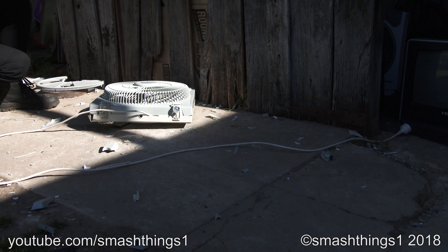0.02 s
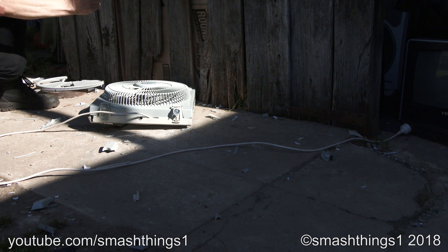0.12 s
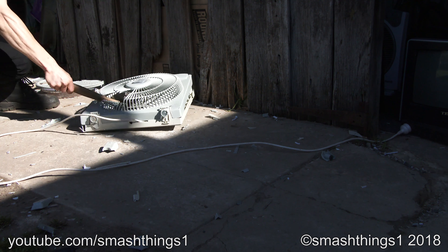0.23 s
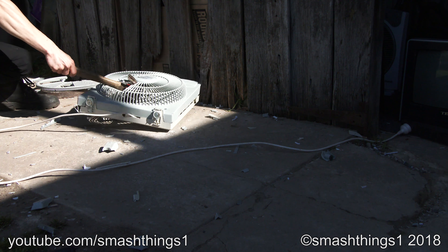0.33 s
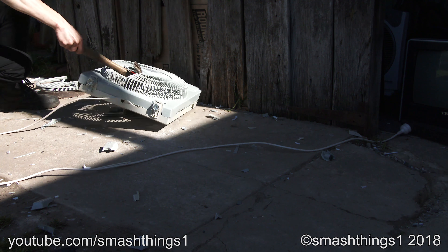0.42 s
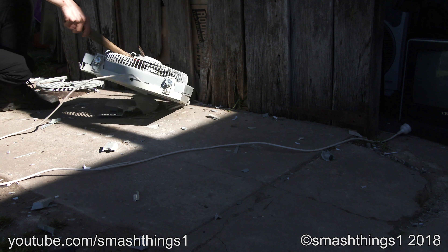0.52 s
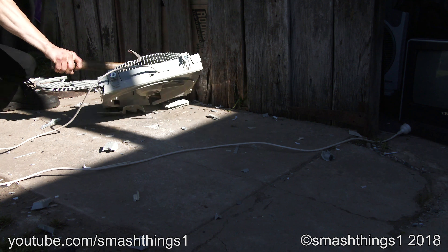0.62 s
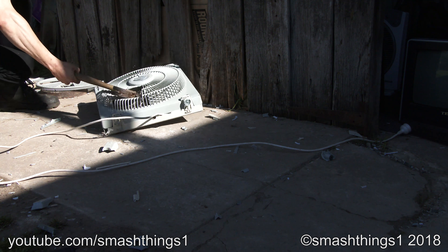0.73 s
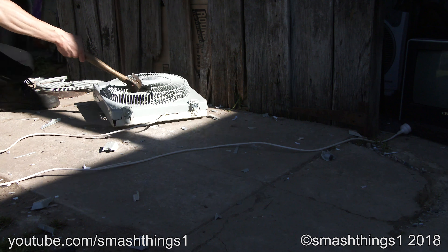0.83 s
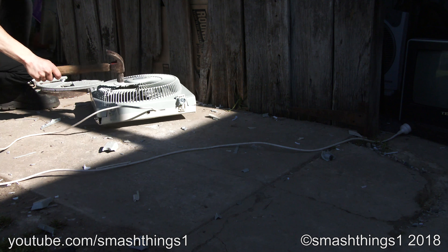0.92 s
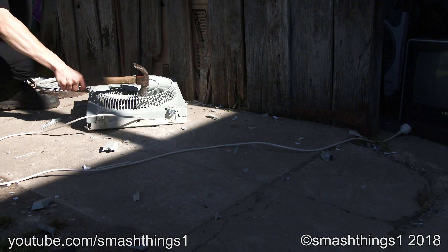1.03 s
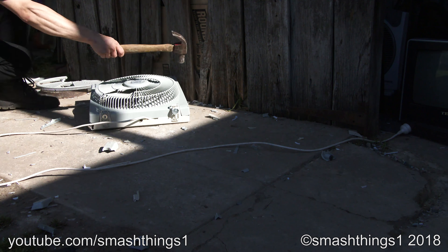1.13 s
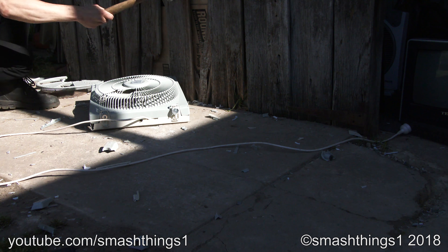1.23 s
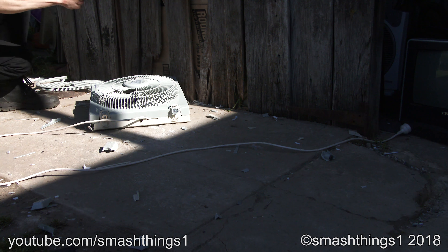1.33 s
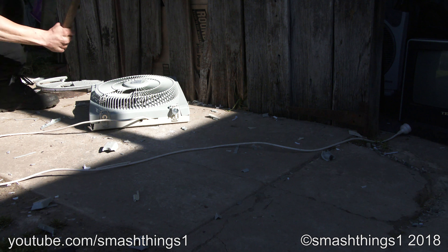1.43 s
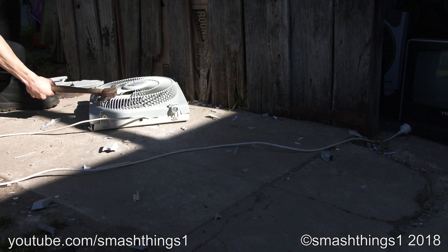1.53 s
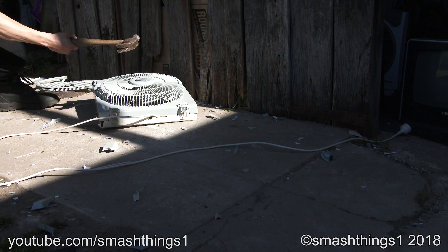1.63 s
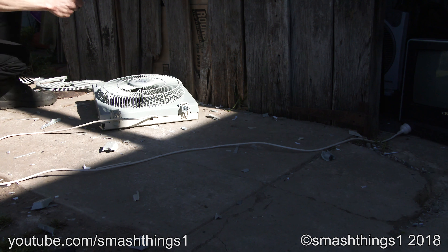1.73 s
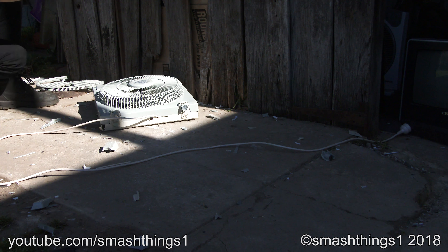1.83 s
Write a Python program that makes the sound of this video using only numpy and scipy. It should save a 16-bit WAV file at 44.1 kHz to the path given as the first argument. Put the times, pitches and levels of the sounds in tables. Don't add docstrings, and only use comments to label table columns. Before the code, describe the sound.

A hammer cracks a plastic box fan on concrete; the fan lifts, clatters down in hard bounces, rocks and rattles, then a second crunching blow. Quiet yard, close microphone, faint fence echoes, narrow stereo.

```python
import sys
import numpy as np
from scipy import signal
from scipy.fft import rfft, irfft, next_fast_len
from scipy.io import wavfile

SR = 44100
rng = np.random.default_rng(int(sys.argv[2]) if len(sys.argv) > 2 else 0)


def level_to_linear(level):
    exponent = np.asarray(level, float) / 20
    return 10 ** exponent


def put_to_file(sound):
    columns = np.atleast_2d(sound).T
    safe = np.clip(columns, -1, 1)
    whole_steps = np.round(safe * 32767)
    wavfile.write(sys.argv[1], SR, whole_steps.astype(np.int16))


N = 81585


def at_hz(points, hz):
    p = np.array(points, float)
    return level_to_linear(np.interp(np.log(hz + 1), np.log(p[:, 0]), p[:, 1]))


def grains(shape, per_s, uneven_db):
    size = level_to_linear(uneven_db * np.minimum(rng.exponential(1, shape), 5))
    sign = rng.choice([-1, 1], shape)
    present = rng.random(shape) < per_s / SR
    x = size * sign * present
    return x / np.sqrt(np.mean(x ** 2))


# frequency_hz, level_db
YARD_SPECTRUM = [(18, -29.5), (30, -6.5), (149, 0.5), (459, -9), (698, -13), (2330, -11), (3030, -12.5),
                 (8200, -23), (15800, -48.5)]


def yard_air():
    hz = np.arange(N // 2 + 1) * SR / N
    air = irfft(rfft(rng.standard_normal((2, N))) * at_hz(YARD_SPECTRUM, hz), N)
    side_gain = level_to_linear([[0], [-7]])
    return level_to_linear(-76.5) * air / air.std() * side_gain


# delay_s, level_db
FENCE_ECHOES = [(.006, -26), (.017, -20.5)]


def fence_echoes(fan):
    dull = signal.lfilter([.5], [1, -.5], fan)
    out = fan.copy()
    for delay_s, db in FENCE_ECHOES:
        lag = int(delay_s * SR)
        out[:, lag:] += level_to_linear(db) * dull[:, :-lag]
    return out


# start_s, pitch_hz, level_db, t60_s
METAL_PINGS = [(0.0, 2121, -69, 1.8), (0.102, 3121, -64, .4), (0.125, 3760, -76, .8),
               (0.195, 2331, -63.5, 1.5), (0.11, 2370, -71, 0.51), (.13, 3960, -77, 0.91),
               (0.448, 15400, -86.5, 0.31), (0.542, 15400, -69.5, 0.062), (0.542, 10750, -69.5, 0.13),
               (1.24, 2340, -72, 0.62)]


def metal_pings():
    out, t = 0, np.arange(N) / SR
    for s, hz, db, t60 in METAL_PINGS:
        age = np.maximum(t - s, 0)
        envelope = level_to_linear(db - 60 * age / t60) * np.minimum(age / 0.006, 1)
        split_hz = hz + 33 * rng.uniform(0.18, 1.6)
        ring = np.sin(2 * np.pi * hz * age) + 0.5 * np.sin(2 * np.pi * split_hz * age)
        out = out + envelope * ring
    return out * np.array([[1], [.3]])


# start_s, level_db, pitch_hz
GROUND_THUMPS = [
    (0.252, -30, 59.6),
    (0.416, -58, 50),
    (0.919, -60.5, 55),
    (0.681, -60.5, 109),
    (0.814, -68.5, 49.7),
    (1.554, -30, 59),
]


def ground_thumps():
    out, t = 0, np.arange(N) / SR
    for s, db, hz in GROUND_THUMPS:
        turns = np.maximum(t - s, 0) * hz
        envelope = np.minimum(4 * turns, 1) * np.exp(-turns / 0.11)
        out = out + level_to_linear(db) * np.sin(2 * np.pi * turns) * envelope
    return out


# start_s, pitch_hz, level_db, t60_s
PANEL_RINGS = [(.04, 661, -50, 0.057), (.44, 668, -56, 0.49), (.146, 635, -42, 0.049),
               (.146, 1030, -53, 0.068), (.186, 1125, -55.5, 0.094), (.26, 1510, -30, 0.12),
               (.26, 1017, -35, 0.12), (.3, 989, -27, 0.053), (.762, 211, -42.5, 0.091),
               (.684, 1310, -12.5, 0.027), (.684, 1048, -26.5, 0.098), (.684, 1685, -25, 0.091),
               (.76, 1086, -10.5, 0.035), (.76, 667.5, -26, 0.15), (.768, 1618, -29, 0.12),
               (.814, 1129, -30, 0.071), (.886, 262, -48, 0.14), (.935, 495, -43, 0.14),
               (1.039, 1030, -23.5, 0.028), (0.251, 212.4, -36.5, 0.0943), (1.085, 655, -26.5, 0.096),
               (1.118, 646, -31, 0.081), (.26, 800, -21, 0.058), (1.552, 525.4, -25, 0.11),
               (1.555, 917, -21.5, 0.056), (1.558, 1667, -23.5, 0.079), (1.558, 1400, -33, 0.049),
               (1.555, 380, -33.5, 0.12), (1.697, 1077, -38, 0.08)]


def panel_rings():
    out, t = 0, np.arange(N) / SR
    for s, hz, db, t60 in PANEL_RINGS:
        age = np.maximum(t - s, 0)
        envelope = level_to_linear(db - 60 * age / t60) * (1 - np.exp(-age / 0.0015))
        out = out + envelope * np.sin(2 * np.pi * hz * age)
    return out * np.array([[1], [.5]])


# pitch_hz, width_hz, level_db
CASE_MODES = [(390, 240, -28), (522, 88, -8), (655, 91, -2.5), (800, 70, -12.5), (920, 24, -8.5),
              (1073, 39, -9), (1110, 34, -1.5), (1310, 160, -5.5), (1500, 460, -4), (1840, 39, -0.5),
              (2120, 120, -7), (2300, 200, -10), (2690, 410, -19), (3670, 2100, -5)]
FOCUS_OCTAVES, FOCUS_DB = 0.9, 10
BROAD_DB, BROAD_Q = 2.5, 1.044
BAFFLE_HZ = 380
CONTACT_RATIO = 4.0


def case(hz, gains_db, centre_hz):
    f, width, db = np.transpose(CASE_MODES)
    focus = FOCUS_DB * (np.exp(-(np.log2(f / centre_hz) / FOCUS_OCTAVES) ** 2) - 1)
    gain = level_to_linear(db + focus + gains_db) * (-1.) ** np.arange(len(f))
    damping = 1j * hz * width[:, None]
    modes = damping / (f[:, None] ** 2 - hz ** 2 + damping)
    u, low = 1j * hz / centre_hz, 1j * hz / BAFFLE_HZ
    hump = level_to_linear(BROAD_DB) * u / BROAD_Q / (1 + u / BROAD_Q + u * u)
    contact = 1 / (1 + u / CONTACT_RATIO) ** 3
    baffle = low ** 3 / (1 + low + low ** 2) / (1 + low)
    return (gain @ modes + hump) * contact * baffle


# frequency_hz, level_db (per Hz)
CRACK_SPECTRUM = [(1500, -13), (3000, 1.5), (5500, 2), (9000, -3), (13000, -3.5), (15700, -10),
                  (16200, -19.5)]


def snap(hz):
    cepstrum = irfft(np.log(at_hz([(300, -84.5)] + list(CRACK_SPECTRUM), hz)))
    half = len(cepstrum) // 2
    cepstrum[1:half] *= 2
    cepstrum[half + 1:] = 0
    return np.exp(rfft(cepstrum))


# time_s, level_db, crack_db (re level), grille_share (0-1, high grille side)
RATTLE_COURSE = [(0, -69.5, -18, 0.47), (0.247, -80, 0, 0.2), (0.273, -33, -3, 0.56),
                 (0.339, -42, -6, 0.64), (.43, -50.5, -11, 0.46), (0.569, -70.5, -3.5, 0.3),
                 (0.661, -54.5, -13, 0.14), (0.699, -33, -5.5, 0.42), (0.747, -44, -10.5, 0.12),
                 (0.837, -41.5, 0.5, 0.58), (0.898, -47.5, -12, 0.18), (0.99, -59, -10.5, 0.53),
                 (1.09, -37, -11, 0.55), (1.281, -71, -11.5, 0.37), (1.543, -91, -20.5, 0.42),
                 (1.576, -38.5, -5.5, 0.7), (1.678, -54.5, -9.5, 0.63), (1.85, -64.5, -10.5, 0.1)]


def rattle():
    size = 2 * next_fast_len(N // 2 + 4096)
    hz, t = np.arange(size // 2 + 1) * SR / size, np.arange(N) / SR
    s, db, crack_db, grille_share = np.transpose(RATTLE_COURSE)
    body_taps, crack_taps = grains((2, 2, N), per_s=2500, uneven_db=2.3)

    def filtered(taps, response):
        x = irfft(rfft(taps, size) * response)[:, :N]
        return x / x.std()

    frame = filtered(body_taps, case(hz, 0, centre_hz=700))
    grille = filtered(body_taps, case(hz, 0, centre_hz=1350))
    share = np.clip(np.interp(t, s, grille_share), 0, 1)
    body = (1 - share) * frame + share * grille
    crack = filtered(crack_taps, snap(hz) / (1 + 1j * hz / 6500))
    u = 1j * hz / 180
    rumble = filtered(crack_taps, (u / (1 + u + u * u)) ** 2)
    mix = body + level_to_linear(np.interp(t, s, crack_db)) * crack + level_to_linear(-22.5) * rumble
    return level_to_linear(np.interp(t, s, db)) * mix


SIZE = 8192
BURST_PER_S, BURST_UNEVEN_DB = 16000, 3.23
MODE_CHANCE_DB = 7
CRACK_SHORTER = 0.84
FIRST_TOUCH = 4.8


def impacts(rows, attack_s, top_hz):
    out, t = np.zeros((2, N + SIZE)), np.arange(SIZE) / SR
    hz = np.arange(SIZE // 2 + 1) * SR / SIZE
    bright = snap(hz) / (1 + 1j * hz / top_hz)
    rise = 1 - np.exp(-t / attack_s)
    for s, db, crack_db, centre_hz, decay_s in rows:
        hits = grains((3, SIZE), BURST_PER_S, BURST_UNEVEN_DB)
        hits[0, int(2 * attack_s * SR)] = FIRST_TOUCH
        chance_db = rng.normal(0, MODE_CHANCE_DB, (2, len(CASE_MODES)))
        envelope = rise * np.exp(-t / decay_s)
        short = rise * np.exp(-t / decay_s / CRACK_SHORTER)
        start = int(s * SR)
        for ch in range(2):
            body = irfft(rfft(hits[ch] * envelope) * case(hz, chance_db[ch], centre_hz))
            crack = irfft(rfft(hits[2 - ch] * short) * bright)
            both = body / abs(body).max() + level_to_linear(crack_db) * crack / abs(crack).max()
            out[ch, start:start + SIZE] += level_to_linear(db - 4.5) * both
    return out[:, :N]


# start_s, level_db (peak), crack_db (re peak), centre_hz
SHARD_TICKS = [(0.06, -65, 9.5, 2090), (0.465, -56, 8, 694), (0.498, -48.5, 3.5, 700), (0.73, -35, 3, 1230),
               (1.169, -34.5, -10, 1090), (1.219, -42.5, -49.5, 1130), (1.226, -44.5, -28.5, 1960),
               (1.249, -55, 2.5, 603), (1.299, -50.5, -2.5, 638), (1.381, -73.5, 13.5, 2370),
               (1.473, -71, 16, 2006), (1.631, -34, -14, 920), (1.653, -38, 2.5, 2480),
               (1.677, -37, -10, 1550), (1.696, -31.5, -14, 1070), (1.718, -32.5, -6, 854),
               (1.734, -31, -8, 900), (1.763, -33, -5, 1110), (1.769, -40, -5, 650), (1.813, -56, 8, 1520),
               (1.832, -46.5, 6, 1140), (0.881, -60, 12, 900), (.905, -53, 5, 900), (0.9156, -53, 14, 900),
               (0.9252, -55, 19.5, 900), (.948, -52, 14.5, 900), (0.967, -64, 10, 900),
               (1.004, -55, 11, 900), (1.018, -55, 17, 900), (1.37, -73, 9, 2004), (.52, -46.5, -2.5, 2020),
               (0.668, -40, 8, 900)]


def shard_ticks():
    decay_s = 0.011
    return impacts([(*row, decay_s) for row in SHARD_TICKS], attack_s=0.000064, top_hz=6500)


# start_s, level_db (peak), crack_db (re peak), centre_hz, decay_s
CASE_KNOCKS = [(.039, -43, -16, 700, 0.014), (.145, -42.5, -20, 705, 0.0056),
               (.186, -38.5, -32, 840, 0.0059), (.36, -33, -5, 606, 0.0032), (.3925, -28, 5, 1470, 0.013),
               (.409, -29.5, -27, 1210, 0.0023), (.578, -46, -16, 656, 0.0087),
               (.594, -43.5, -7, 700, 0.008), (.614, -35.5, -33, 940, 0.012),
               (.635, -32, -3.5, 590, 0.0061), (.72, -28.5, -3, 1180, 0.0034),
               (.889, -40.5, -16, 497, 0.0042), (.932, -31.5, -7.5, 605, 0.019),
               (.997, -54.5, 20, 600, 0.0031), (1.026, -29, -2.5, 1000, 0.007),
               (1.055, -29.5, -1, 900, 0.019), (1.0615, -28.5, -4, 1010, 0.0075),
               (1.069, -32.5, -1, 587, 0.015), (1.0805, -24.5, -4, 645, 0.003),
               (1.0855, -30, 12.5, 686, 0.0085), (1.0905, -21, -16, 700, 0.0061),
               (1.105, -23.5, -32, 680, 0.0033), (1.1165, -23, -32, 680, 0.0033),
               (1.139, -33, 1.5, 1680, 0.008), (.066, -49.5, -43, 970, 0.022), (.105, -52, -30, 800, 0.018),
               (.172, -44.5, -12, 637, 0.011), (1.13, -41, -22, 664, 0.012)]


def case_knocks():
    return impacts(CASE_KNOCKS, attack_s=0.0033, top_hz=14000)


# start_s, level_db (peak), crack_db (re peak), centre_hz, decay_s
HAMMER_AND_FALLS = [(0.2452, -58, 23, 2400, 0.0019), (0.2485, -9.5, 5, 800, 0.011),
                    (0.2592, -4, -3, 1200, 0.006), (0.267, -23, 4, 990, 0.0062),
                    (0.6752, -27.5, 8, 1500, 0.0026), (0.678, -18.5, 3.5, 1740, 0.005),
                    (0.6835, -8.5, -1.5, 1310, 0.0063), (0.7575, -9.5, -1, 1060, 0.016),
                    (0.761, -11.5, -4, 1110, 0.005), (0.777, -17.5, -3, 700, 0.0067),
                    (0.8095, -13, 3, 950, 0.0085), (0.8135, -8.5, -0.5, 700, 0.0024),
                    (0.825, -19, 2, 1180, 0.0079), (1.0385, -16, -8, 930, 0.0053),
                    (1.5485, -15.5, 8, 990, 0.01), (1.557, -9, -4, 1370, 0.0097),
                    (1.565, -13, 1, 1210, 0.0098), (1.589, -20, -6, 920, 0.0085),
                    (1.608, -28.5, -32, 700, 0.0038)]


def hammer_and_falls():
    return impacts(HAMMER_AND_FALLS, attack_s=0.0003, top_hz=250000)


# frequency_hz, side_db (re mid)
SIDE_SPECTRUM = [(60, -38.5), (500, -12), (1200, -15.5), (3000, -10.5), (6500, -16), (12000, -35.5)]


def scene():
    fan = metal_pings() + ground_thumps() + panel_rings() + rattle()
    fan = fan + shard_ticks() + case_knocks() + hammer_and_falls()
    fan = fence_echoes(fan)
    hz = np.arange(N // 2 + 1) * SR / N
    lean = .09 / (1 + (hz / 1200) ** 2)
    side = irfft(rfft(fan[1]) * at_hz(SIDE_SPECTRUM, hz) + rfft(fan[0]) * lean, N)
    air = yard_air()
    mid, side = fan[0] + air[0], side + air[1]
    return np.array([mid + side, mid - side])


def band_limit(x):
    return signal.sosfilt(signal.butter(12, 16960, fs=SR, output="sos"), x)


def record(dry):
    limit = 0.48
    rounded = limit * np.tanh(dry / limit)
    top_cut = signal.cheby2(12, 60, 16900, fs=SR, output="sos")
    return band_limit(signal.sosfilt(top_cut, rounded))


dry = scene()
out = record(dry)
put_to_file(out)
```